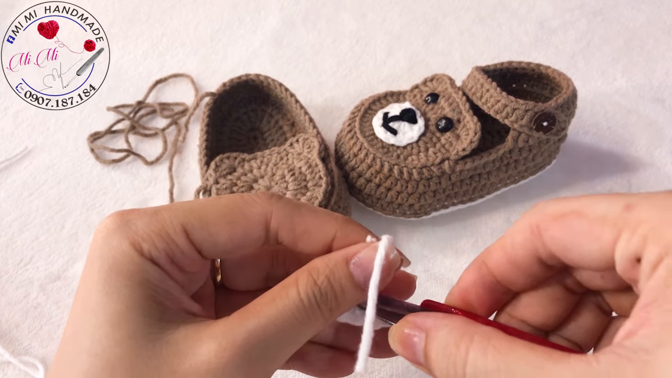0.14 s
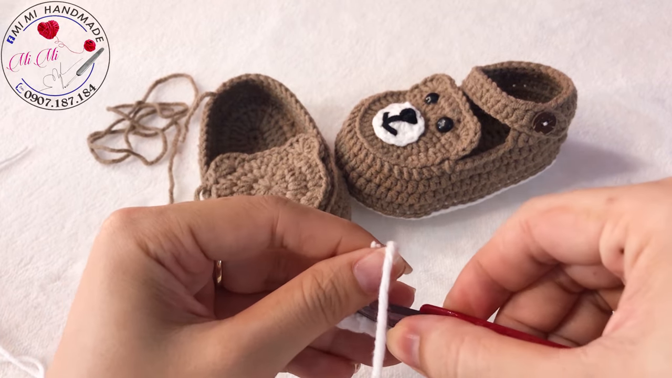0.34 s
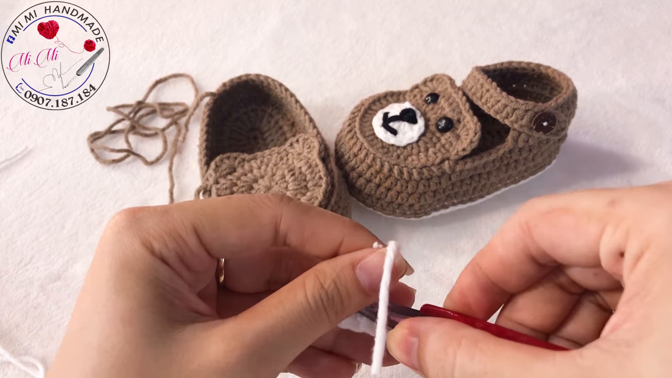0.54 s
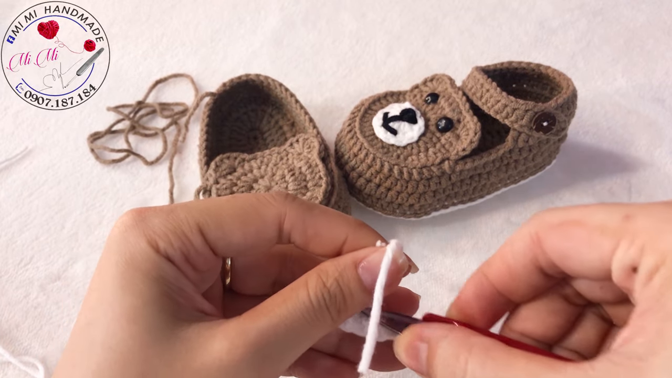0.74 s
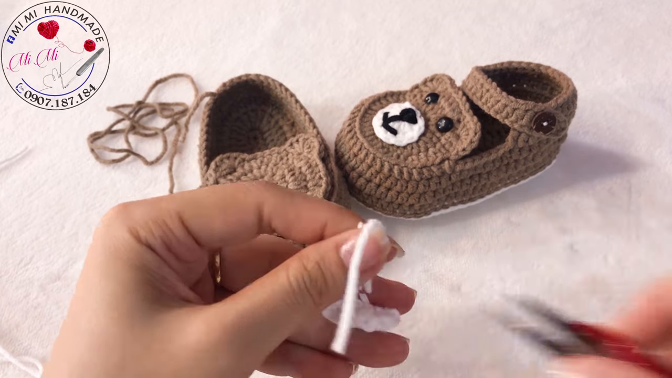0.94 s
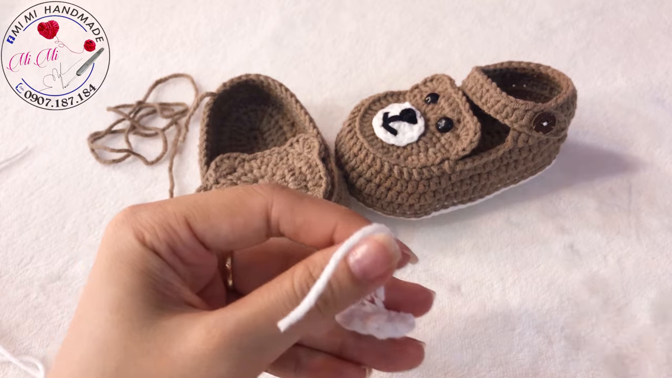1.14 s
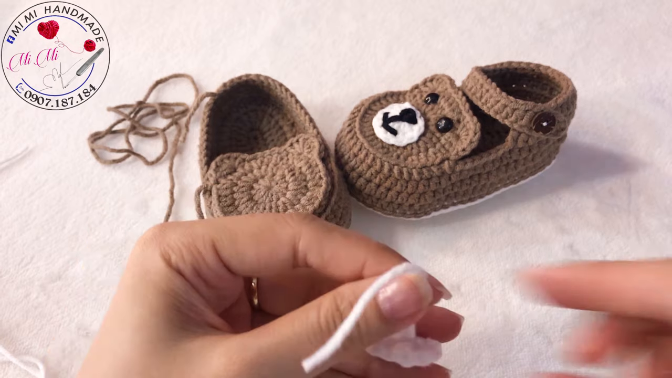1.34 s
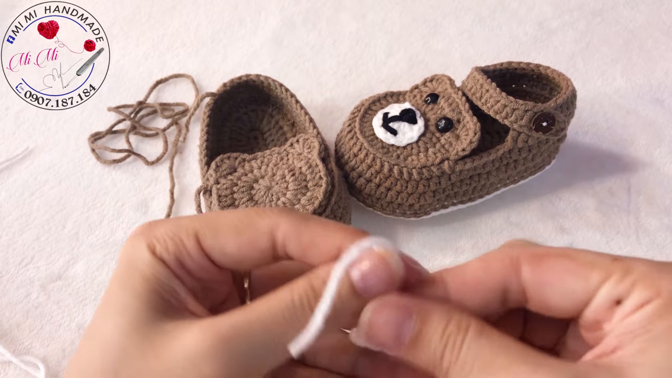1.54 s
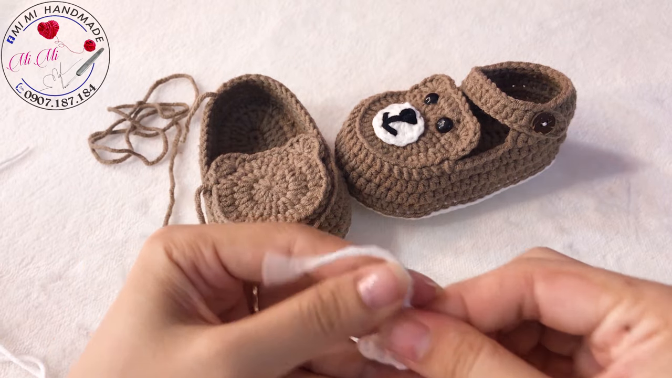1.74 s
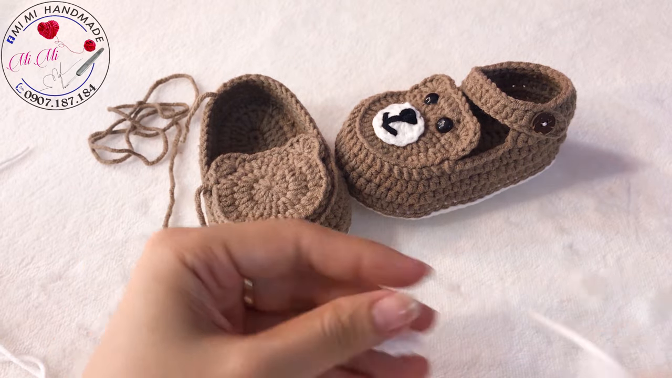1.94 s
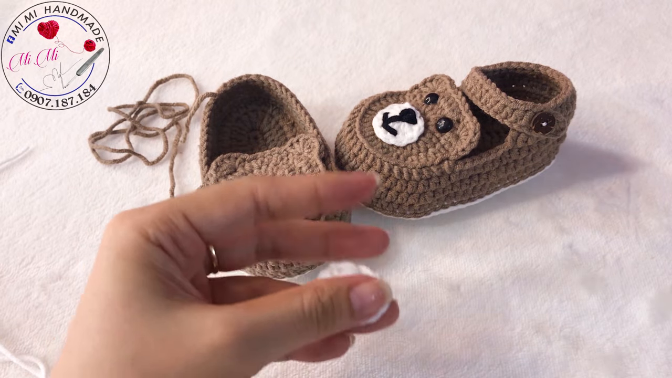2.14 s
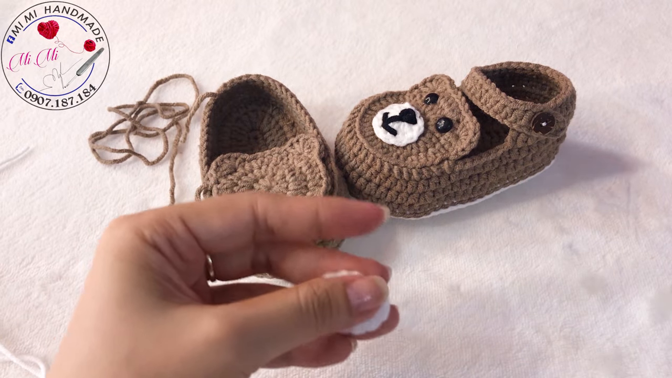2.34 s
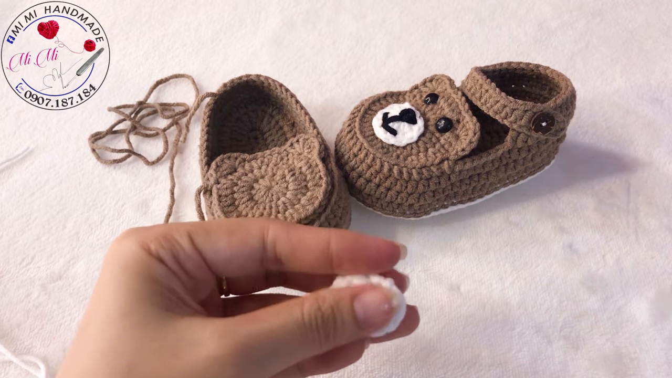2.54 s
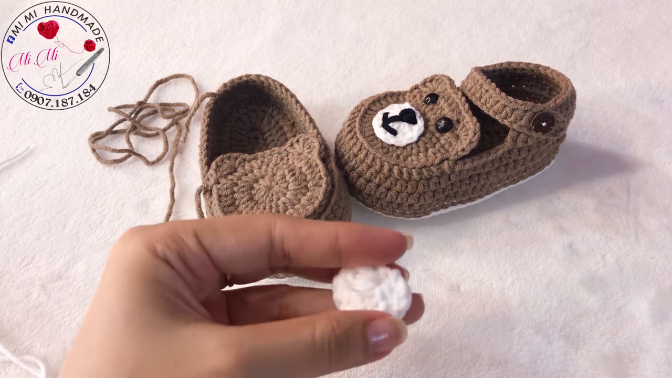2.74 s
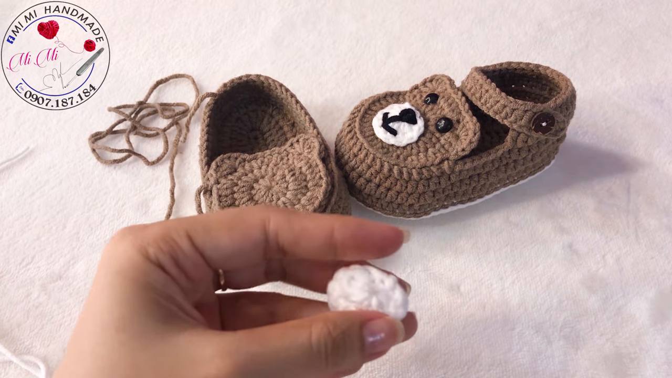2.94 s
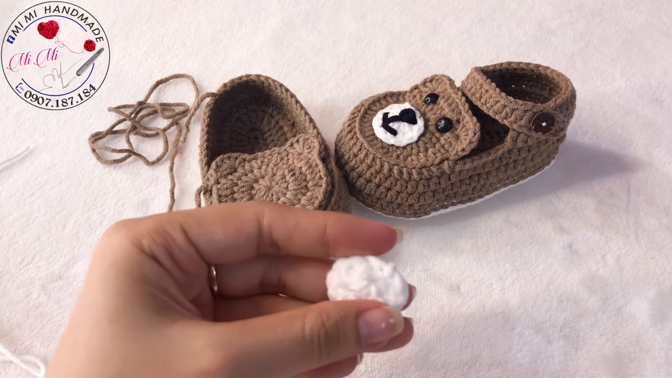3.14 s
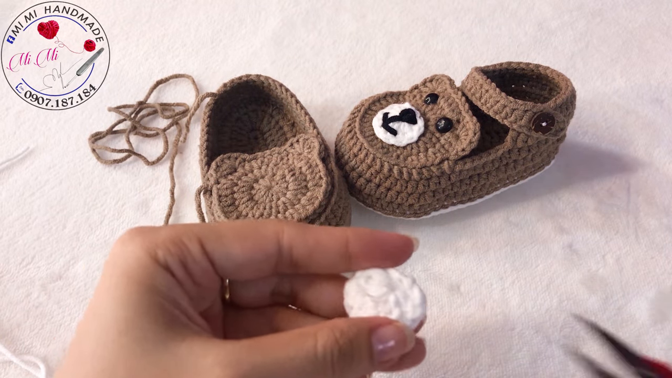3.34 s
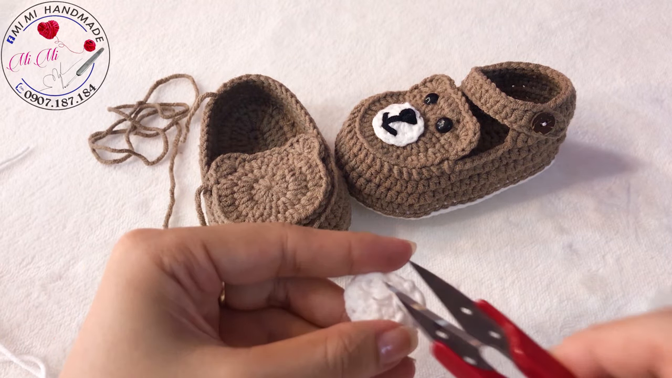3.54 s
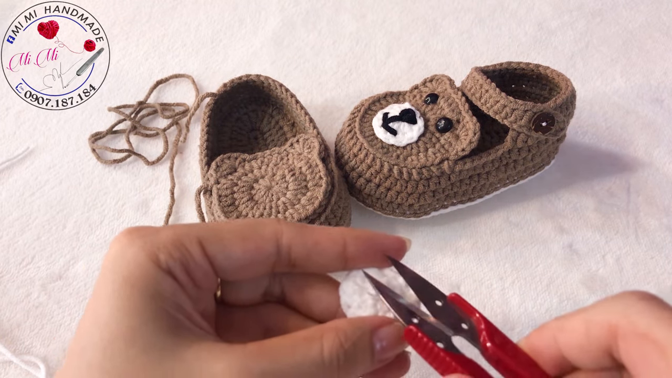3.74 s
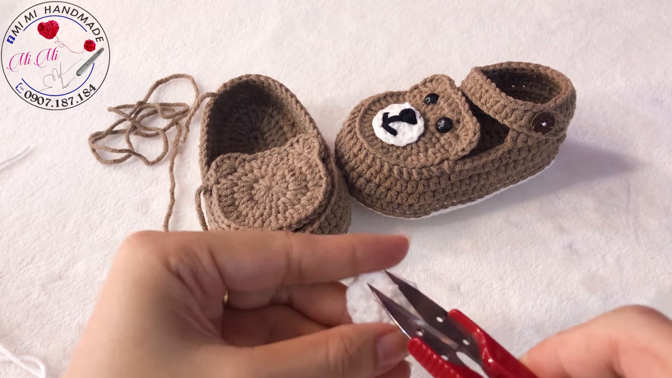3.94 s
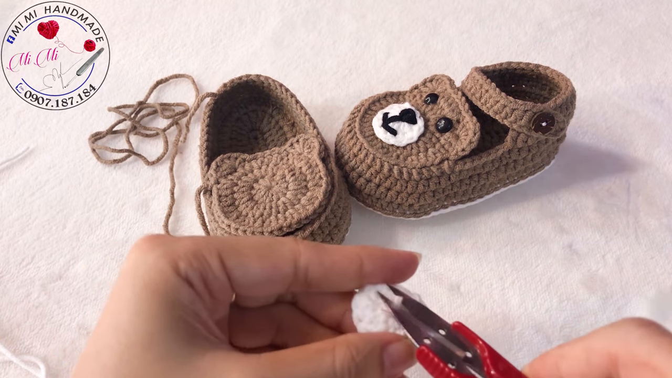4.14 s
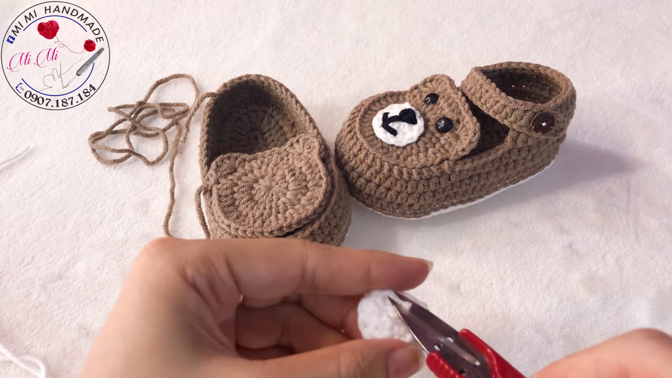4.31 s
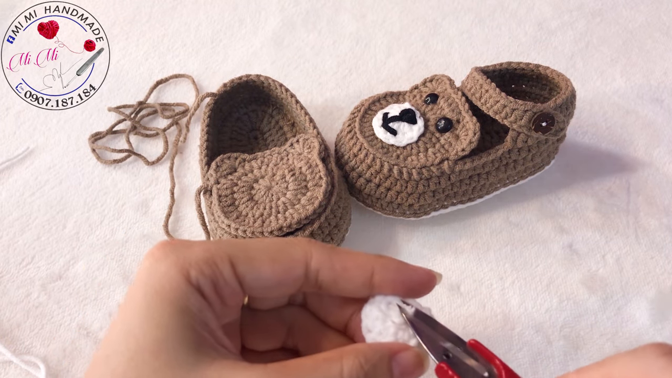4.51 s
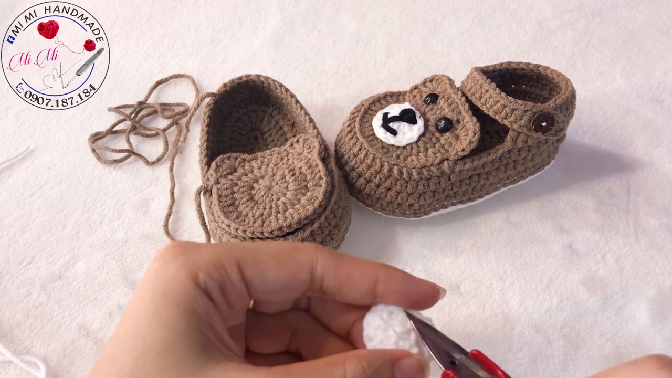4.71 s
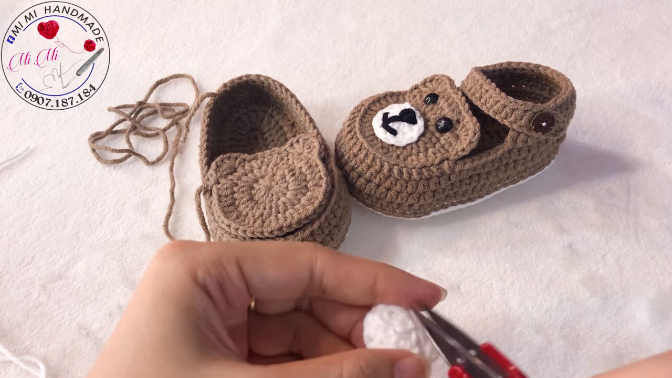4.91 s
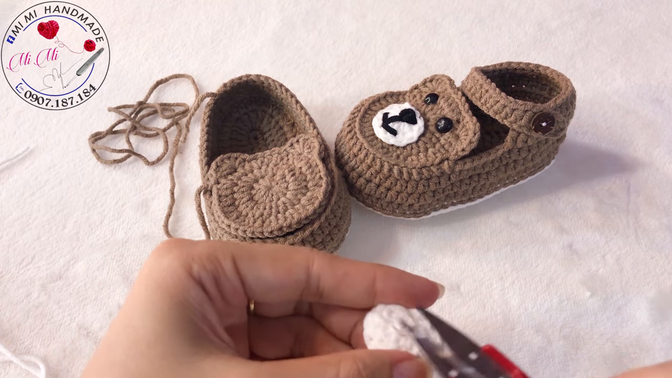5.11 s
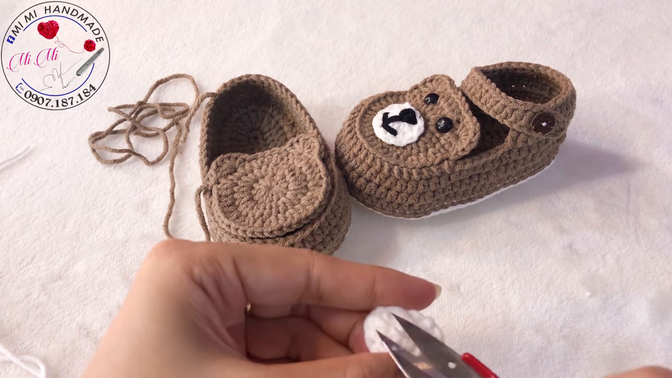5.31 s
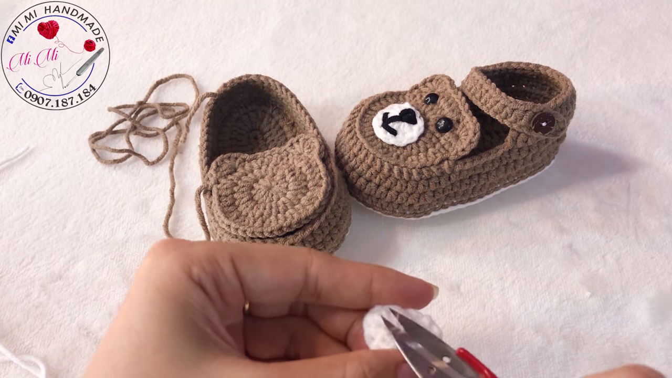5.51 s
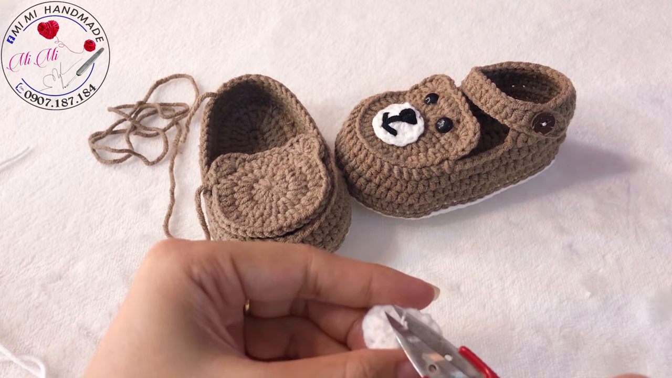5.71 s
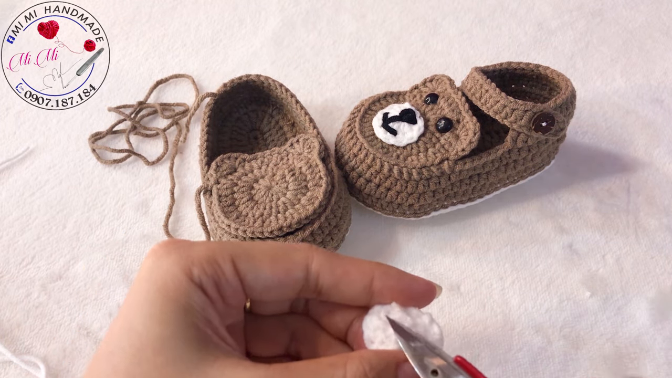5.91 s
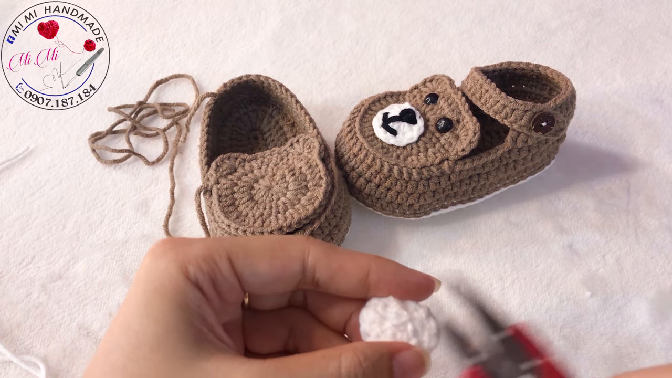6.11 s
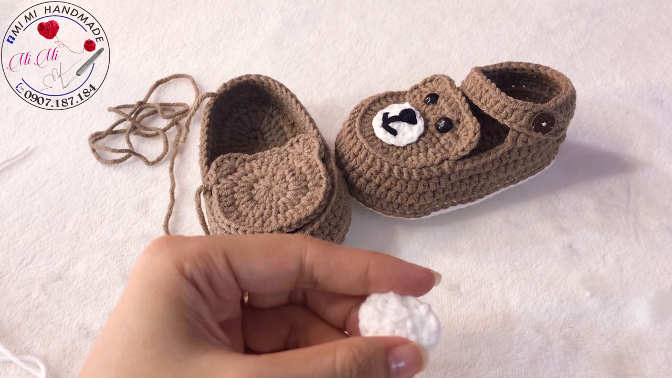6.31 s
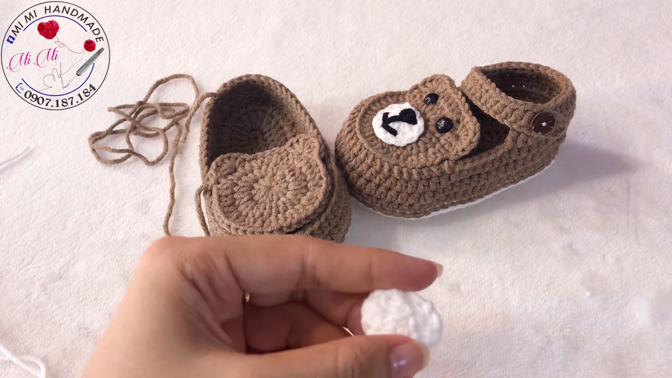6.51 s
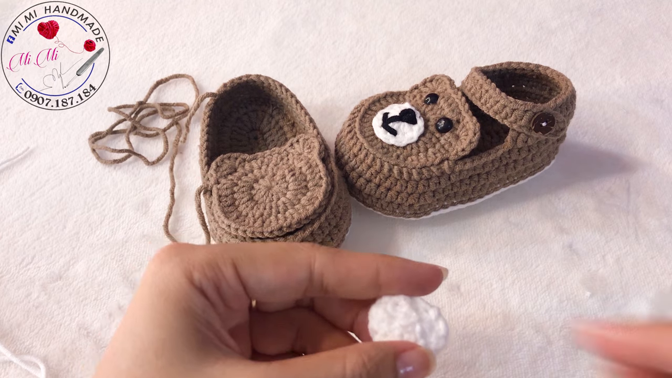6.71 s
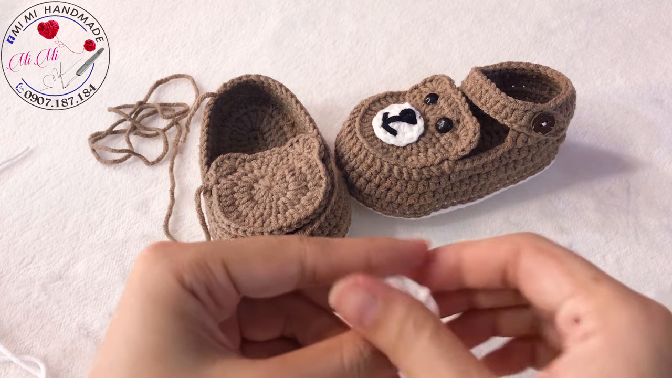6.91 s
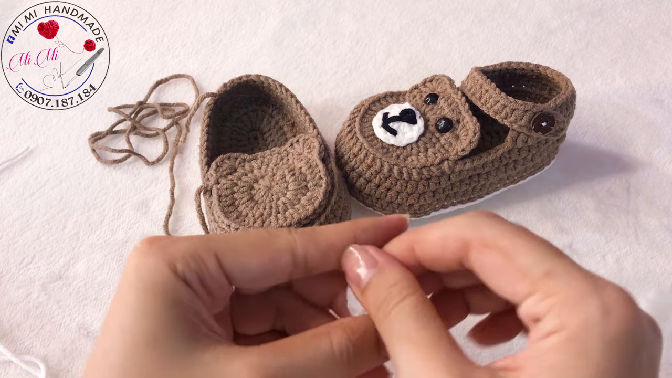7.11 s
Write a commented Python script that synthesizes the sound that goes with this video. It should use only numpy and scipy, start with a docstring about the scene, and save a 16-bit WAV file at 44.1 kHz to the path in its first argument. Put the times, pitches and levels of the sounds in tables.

```python
"""Spring-loaded thread snips cut yarn three times, close to the microphone in a small room.
The blades grind shut in tiny slips, snap through the strand with ringing steel and a crunch of noise,
and scrape open again. Shaped noise makes fingers rustling in the wool, with small ticks and squeaks.
Underneath lie a fan-like low hum, a soft hiss and a thin electrical whine made from a gliding tone."""
import sys
import numpy as np
from scipy import signal
from scipy.fft import rfft, next_fast_len
from scipy.io import wavfile

SR = 44100
rng = np.random.default_rng(int(sys.argv[2]) if len(sys.argv) > 2 else 0)


def output_pcm(signal):
    """Save a mono or channel-first signal as 16-bit PCM at the path in sys.argv[1].

    Samples are clipped to [-1, 1] before scaling.
    """
    pcm = np.clip(np.atleast_2d(signal).T, -1, 1) * 32767
    wavfile.write(sys.argv[1], SR, np.round(pcm).astype(np.int16))


N = 320063
TIME = np.arange(N) / SR
CUTOFF_HZ = 16000


def from_db(db):
    """Turn decibels into a gain."""
    return 10 ** (np.asarray(db) / 20)


def rms_one(x):
    """Scale a sound to an average (rms) level of 1."""
    return x / np.sqrt(np.mean(x ** 2) + 1e-20)


def noise(size):
    """Plain random noise, equally strong at all pitches."""
    return rng.standard_normal(size)


def coloured(x, spectrum):
    """Shape a sound by (pitch_hz, level_db) points, falling 80 dB per octave past the ends; rms 1."""
    hz, db = np.transpose(spectrum)
    size = next_fast_len(len(x))
    f = np.maximum(np.fft.rfftfreq(size, 1 / SR), 1)
    octaves_outside = np.abs(np.log2(f / np.clip(f, hz[0], hz[-1])))
    gain = from_db(np.interp(np.log(f), np.log(hz), db) - 80 * octaves_outside)
    shaped = np.fft.irfft(rfft(x, size) * gain, size)
    return rms_one(shaped[:len(x)])


def tilted(x, tilt_db):
    """Raise the treble by so many dB per octave above 3 kHz; rms 1."""
    points = [(hz, tilt_db * np.log2(max(hz, 3000))) for hz in (1000, 3000, CUTOFF_HZ)]
    return coloured(x, points)


def swells(rows):
    """Bell-shaped gains that rise and fall around each (centre_s, level_db, spread_s)."""
    return sum(from_db(db) * np.exp(-.5 * ((TIME - s) / spread) ** 2) for s, db, spread in rows)


def add(track, s, sound):
    """Mix a sound into a track at a given time in seconds."""
    i = int(round(s * SR))
    track[i:i + len(sound)] += sound[:N - i]


def friction_tone(length, hz, waver, waver_hz=150):
    """Rubbing can sing: a brief tone that swells and fades while its pitch wavers at random."""
    size = max(int(length * SR), 256)
    smooth = signal.butter(2, waver_hz, fs=SR, output="sos")
    wander = rms_one(signal.sosfilt(smooth, noise(SR)))[-size:]
    pitch_hz = hz * (1 + waver * wander)
    tone = np.sin(2 * np.pi * np.cumsum(pitch_hz) / SR)
    return signal.windows.tukey(size, .5) * rms_one(tone)


# colour of the room's tail: pitch_hz, relative_level_db
WALL_COLOUR = [(300, -11), (1000, 1.5), (1800, -7.5), (2500, 1), (3200, 4.5), (4000, -0.5), (4900, -1),
               (6800, 3), (8700, -3), (10500, -7), (12500, -2.5), (14000, -7.5), (16000, -19)]
ROOM_T60_S = 0.29   # time for the tail to fade by 60 dB


def room(x, tail_db=-23, echo_db=-21, echo_s=.006, first_wall_s=0.01, sideways=0.67):
    """Walls send back one near reflection, then a fading, blurred tail."""
    t = TIME[:SR // 2]
    fade = from_db(-60 * t / ROOM_T60_S) * np.clip(t / first_wall_s, 0, 1)
    tail = coloured(noise(len(t)), WALL_COLOUR) * fade
    # what leaves in all directions has a flatter spectrum than what goes straight to the microphone
    share = np.clip(sideways, 0, 1)
    radiated = x * (np.sqrt(1 - share) + np.sqrt(share) * rng.choice([-1, 1], N))
    out = x + from_db(tail_db) * signal.fftconvolve(radiated, tail / np.linalg.norm(tail))[:N]
    add(out, echo_s, from_db(echo_db) * x)
    return out


# colour of the fan's rumble: pitch_hz, relative_level_db
FAN_COLOUR = [(20, -39.5), (35, -22), (50, -1.5), (75, -7.5), (130, -7.5), (180, -6), (210, -2.5),
              (290, -1), (330, -6.5), (420, -14), (490, -20.5), (590, -19.5), (680, -15.5), (1000, -22.5)]


def fan_rumble(level_db=-42.0):
    """A fan's broad rumble: steady noise kept to the low pitches."""
    return from_db(level_db) * coloured(noise(N), FAN_COLOUR)


# colour of the soft hiss: pitch_hz, relative_level_db
HISS_COLOUR = [(590, -13.5), (1000, -2), (1160, -2), (1240, 0.5), (1710, -3.5), (2770, -10), (3370, -10),
               (4920, -15.5), (6260, -12.5), (7700, -17), (10500, -19), (11400, -17.5), (15500, -15.5)]


def hiss(level_db=-54):
    """Steady random noise heard as a soft hiss."""
    return from_db(level_db) * coloured(noise(N), HISS_COLOUR)


# narrow humming resonances: pitch_hz, width_hz (half of each filter's bandwidth), level_db (rms)
HUMS = [(47.8, 5.4, -53.5), (197.8, 4.4, -54), (219.5, 4.9, -51), (268.8, 10.7, -50.5),
        (294.2, 10.5, -51.5), (419.8, 7.4, -62), (818.4, 26.6, -58), (1382, 76, -65.5), (3670, 37, -77.5)]


def fan_hums():
    """Resonances hum with the fan: noise passed twice through each narrow filter."""
    out = np.zeros(N)
    for hz, width, db in HUMS:
        b, a = signal.iirpeak(hz, hz / (2 * width), fs=SR)
        hum = signal.lfilter(b, a, noise(N + SR))
        hum = signal.lfilter(b, a, hum)[SR:]   # drop the first second, while the filter builds up
        out += from_db(db) * rms_one(hum)
    return out


FIRST_FLICK_S, FLICK_PERIOD_S = 0.345, 0.64


def whine(hz=11020, step_hz=110, level_db=-73, rise_hz=1200, width_s=.018):
    """Electrical whine: one tone flicks upward regularly and changes step at every second flick."""
    flicks = (TIME - FIRST_FLICK_S) / FLICK_PERIOD_S
    from_flick_s = (flicks - np.round(flicks)) * FLICK_PERIOD_S
    upper_step = np.maximum(flicks, 0) // 2 % 2
    pitch_hz = hz + step_hz * upper_step + rise_hz * np.exp(-np.abs(from_flick_s) / width_s)
    return from_db(level_db) * rms_one(np.sin(2 * np.pi * np.cumsum(pitch_hz) / SR))


# thin squeaks of wool and steel: start_s, end_s, pitch_hz, level_db
SQUEAK_TIMES = [(0.838, 0.870, 5460, -55), (1.45, 1.727, 3670, -65.5), (1.56, 1.63, 12750, -59),
                (2.10, 2.17, 15000, -59), (3.982, 4.076, 4680, -63), (4.49, 4.723, 3670, -64)]


def squeaks():
    """Faint singing tones as wool and steel rub."""
    out = np.zeros(N)
    for start, end, hz, db in SQUEAK_TIMES:
        add(out, start, from_db(db) * friction_tone(end - start, hz, waver=0.017, waver_hz=220))
    return out


# wool rubbed between the fingers or along a blade: centre_s, level_db, spread_s
WOOL_RUBS = [(0.858, -48.5, 0.016), (1.83, -57, 0.053), (2.17, -50.5, 0.0079), (2.62, -58.5, 0.059),
             (2.88, -58, 0.018), (3.066, -50.5, 0.029), (5.90, -56, 0.018), (7.23, -58, .05)]
# colour of rubbed wool: pitch_hz, relative_level_db
WOOL_COLOUR = [(1000, -20), (2500, 1.5), (5500, 5), (9000, 0), (13000, 3.5), (16000, -3)]
# soft low bumps of the hands: centre_s, level_db, spread_s
HAND_BUMPS = [(1.27, -42, 0.049)]
# colour of a bump: pitch_hz, relative_level_db
HAND_COLOUR = [(70, -2), (130, 2), (200, -14)]
# light touches of fingernails and blade tips: start_s, relative_level_db
LIGHT_TOUCHES = [(0.2418, -37.5), (1.6117, -36), (2.164, -38.5), (2.6783, -38), (3.054, -38), (3.9074, -38),
                 (3.9558, -39.5), (4.0436, -29.5), (5.597, -40.5)]


def fingers(touch_db=-6, touch_t60=0.025, grain_db=5.0):
    """Wool fibres crackle as uneven noise; hands bump softly; nails and tips tick and die away."""
    crackle = noise(N) * from_db(grain_db * noise(N))
    out = swells(WOOL_RUBS) * coloured(crackle, WOOL_COLOUR)
    out += swells(HAND_BUMPS) * coloured(noise(N), HAND_COLOUR)
    t = TIME[:SR // 10]
    for s, db in LIGHT_TOUCHES:
        fade = from_db(db + touch_db - 60 * t / touch_t60)
        add(out, s, fade * coloured(noise(len(t)), GRIT_COLOUR))
    return out


# ringing tones of the steel blades, damped by the hand: pitch_hz, t60_s (time to fade by 60 dB),
# deep_level_db (met deep in the jaws), tip_level_db (met at the tips)
BLADE_TONES = [(707, 0.011, -24, -28.5), (1288, 0.0097, -11.5, -27.5), (2630, 0.0088, -10, -5.5),
               (3140, 0.008, -5.5, -20.5), (4180, 0.0049, -15, -14), (4736, 0.0074, -2, -11.5),
               (5800, 0.0065, -5.5, -12.5), (6170, 0.0083, -3.5, -15), (7005, 0.0087, -9.5, -5.5),
               (8590, 0.011, -11, -1.5), (9830, 0.0075, -15, -13.5), (11890, 0.0076, -2, 1),
               (12870, 0.0048, 3.5, 1.5), (14260, 0.0042, 1.5, -13.5), (14840, 0.007, 1.5, -14),
               (14560, 0.0034, -3.5, -26)]


def blade_ring(place, scatter_db, tilt_db=0):
    """One blow rings the blades: the place of contact sets each tone's share, hardness tilts them."""
    hz, t60, deep_db, tip_db = np.transpose(BLADE_TONES)[:, :, None]
    t = np.arange(int(.02 * SR)) / SR
    db = deep_db + np.clip(place, 0, 1) * (tip_db - deep_db)
    db = db + scatter_db * noise(hz.shape)
    db = db + tilt_db * np.log2(np.maximum(hz, 3000) / 6000)
    signs = (-1) ** np.arange(len(hz))[:, None]
    tones = from_db(db - 60 * t / t60) * np.sin(2 * np.pi * hz * t)
    return np.sum(signs * tones, axis=0)


# colour of edge sliding on edge: pitch_hz, relative_level_db
RASP_COLOUR = [(1500, -1), (2700, -7), (3700, -6), (4700, -3.5), (5600, -10), (6600, 7.5), (7600, -9),
               (8600, 0), (10500, -6), (12300, -5), (13500, 6), (16000, -3)]
FAST_SLIPS_PER_S = 1400   # in bites and openings, at average pressure
SLIP_DOUBLING_DB = 22   # slips come twice as fast for this much more pressure


def stroke(length, start_db, end_db, per_s, place, tilt_db, grit_db, edge_s,
           jitter=.35, uneven_db=5.0, grit_t60=0.036):
    """Stick and slip: uneven tiny blows, faster under pressure, each ringing with a spray of grit."""
    t = TIME[:int((length + edge_s) * SR)]
    pressure_db = np.interp(t, [0, length], [start_db, end_db])
    rate_per_s = per_s * 2 ** ((pressure_db - pressure_db.mean()) / SLIP_DOUBLING_DB)
    slipped = np.cumsum(rate_per_s) / SR
    gaps, sizes = noise((2, 256))
    due = np.cumsum(np.exp(jitter * gaps))
    at = np.searchsorted(slipped, due - due[0])
    blows = from_db(uneven_db * sizes) * rng.choice([-1, 1], len(at))
    in_time = at < len(t)
    slips = np.zeros(len(t))
    slips[at[in_time]] = blows[in_time]
    ring = signal.fftconvolve(slips, blade_ring(place, scatter_db=-2.0))[:len(t)]
    # after each slip the edges go on rasping for a moment
    spray = signal.lfilter([1], [1, -from_db(-60 / (grit_t60 * SR))], np.abs(slips))
    grit = spray * coloured(noise(SR // 2), RASP_COLOUR)[:len(t)]
    contact = np.clip(t / edge_s, 0, 1) * np.clip((length - t) / edge_s + 1, 0, 1)
    mix = rms_one(ring) + from_db(grit_db) * rms_one(grit)
    return from_db(pressure_db) * contact * tilted(mix, tilt_db)


# the spring pushes the blades open: start_s, length_s, start_level_db,
# place (of contact, 0 = deep in the jaws, 1 = at the tips)
SPRING_OPENINGS = [(0.893, 0.035, -37, 0.2), (4.961, 0.02, -46.5, 0.7), (6.069, 0.05, -40.5, 1)]
OPENING_FADE_DB_PER_S, OPENING_TILT_DB = 171, 3   # tilt per octave
JERK_S, JERK_DB = 0.0083, 2   # the blades first come unstuck: length, level relative to the stroke
SING_HZ, SING_DB = 2540, -13   # average pitch of the singing blade, level relative to the stroke


def openings():
    """The blades spring apart: a jerk, then a scrape that fades with pressure, and a rough note."""
    out = np.zeros(N)
    for start, length, db, place in SPRING_OPENINGS:
        jerk = stroke(JERK_S, db + JERK_DB, db + JERK_DB, FAST_SLIPS_PER_S, place,
                      tilt_db=4.0, grit_db=-3, edge_s=0.0055)
        scrape = stroke(length, db, db - OPENING_FADE_DB_PER_S * length, FAST_SLIPS_PER_S, place,
                        OPENING_TILT_DB, grit_db=2, edge_s=.005, uneven_db=8.5)
        note = from_db(db + SING_DB) * friction_tone(length, SING_HZ, waver=0.09, waver_hz=298)
        for sound in (jerk, scrape, note):
            add(out, start, sound)
    return out


# the hand squeezes the blades together: start_s, end_s, start_level_db, end_level_db,
# place (of contact, 0 = deep in the jaws, 1 = at the tips)
HAND_CLOSINGS = [(0.54, 0.68, -60.5, -29.5, 0.05), (4.463, 4.625, -43.5, -51, 1.0),
                 (4.656, 4.748, -47.5, -44.5, 1), (5.773, 5.82, -56.5, -48, 0.85),
                 (5.8244, 5.829, -18.5, -24, 0.9)]
CLOSING_SLIPS_PER_S, CLOSING_TILT_DB = 260, 5   # tilt per octave
# the edges bite into the strand just before each snap: length, end level relative to the snap's
# table strength, rise along the bite, tilt per octave
BITE_S, BITE_DB, BITE_RISE_DB, BITE_TILT_DB = 0.0036, -21, 12, 6


def closings():
    """Edge grinds slowly on edge as the hand squeezes; a fast rising bite leads into every snap."""
    out = np.zeros(N)
    for start, end, start_db, end_db, place in HAND_CLOSINGS:
        grind = stroke(end - start, start_db, end_db, CLOSING_SLIPS_PER_S, place,
                       CLOSING_TILT_DB, grit_db=1.5, edge_s=.0025, grit_t60=.035)
        add(out, start, grind)
    for s, db, place, _, _ in BLADE_SNAPS:
        end_db = db + BITE_DB
        bite = stroke(BITE_S, end_db - BITE_RISE_DB, end_db, FAST_SLIPS_PER_S, place,
                      BITE_TILT_DB, grit_db=-3, edge_s=.0036)
        add(out, s - BITE_S, bite)
    return out


# blades meeting: start_s, relative_strength_db, place (of contact, 0 = deep in the jaws, 1 = at the tips),
# treble_tilt_db (per octave), fibre_crunch_db (relative)
BLADE_SNAPS = [(0.6285, -30.5, 0.05, 5.5, 6.5), (0.653, -24.5, 0.05, 6, 3), (0.6695, -17, 0.05, 4.5, 8),
               (0.6840, 10, 0.014, -2.4, -3.5), (0.6864, -12, 0.01, 0, -1.5), (4.7521, 7.5, 0.99, -1, -8),
               (5.8322, -1, 0.81, -4.5, -13)]
# colour of steel on steel and on fibres, also used for light touches: pitch_hz, relative_level_db
GRIT_COLOUR = [(1000, -6), (2000, -23), (2800, -0.5), (5000, -5), (7000, -4.5), (9000, 1), (11000, -2.5),
               (12500, -2.5), (14200, 6), (16000, -2.5)]


def snaps(level_db=-6, fibre_t60=0.0073):
    """The strand gives way: a crunch of parting fibres, and the blades slam together and ring."""
    out = np.zeros(N)
    for s, db, place, tilt_db, crunch_db in BLADE_SNAPS:
        ring = blade_ring(place, scatter_db=3.5, tilt_db=tilt_db)
        crunch = tilted(coloured(noise(len(ring)), GRIT_COLOUR), tilt_db)
        crunch *= from_db(crunch_db - 60 * TIME[:len(ring)] / fibre_t60)
        add(out, s, from_db(db + level_db) * (ring + crunch))
    return out


def scene():
    """Snips and fingers in the room, over the steady background."""
    close_sounds = snaps() + closings() + openings() + fingers() + squeaks()
    in_room = room(close_sounds)
    background = fan_rumble() + hiss() + fan_hums() + whine()
    return (in_room + background)[None]


def record(dry):
    """The loudest peaks overload the input and are rounded off; the very top pitches are cut."""
    clipped = dry / (1 + dry ** 6) ** (1 / 6)
    low_pass = signal.cheby2(16, 70, CUTOFF_HZ + 700, fs=SR, output="sos")
    return signal.sosfilt(low_pass, clipped)


dry = scene()
out = record(dry)
output_pcm(out)
```